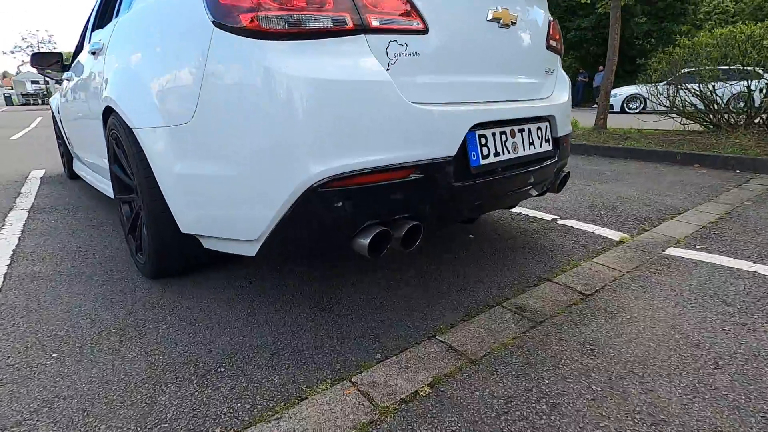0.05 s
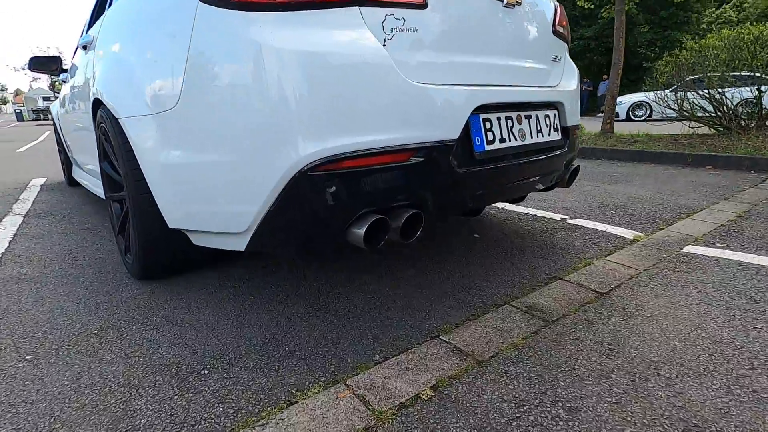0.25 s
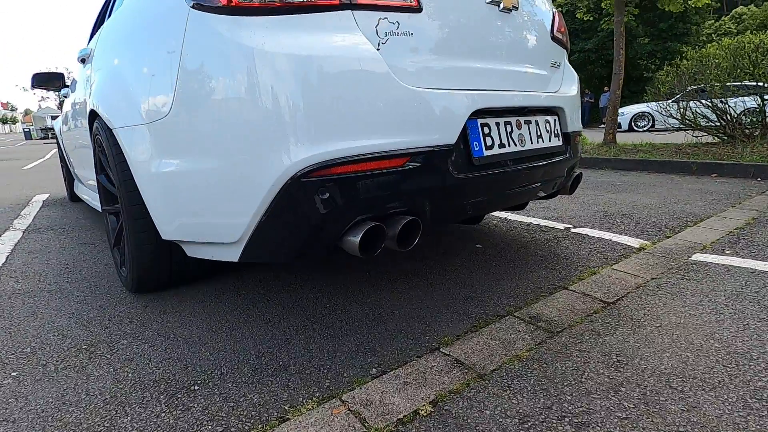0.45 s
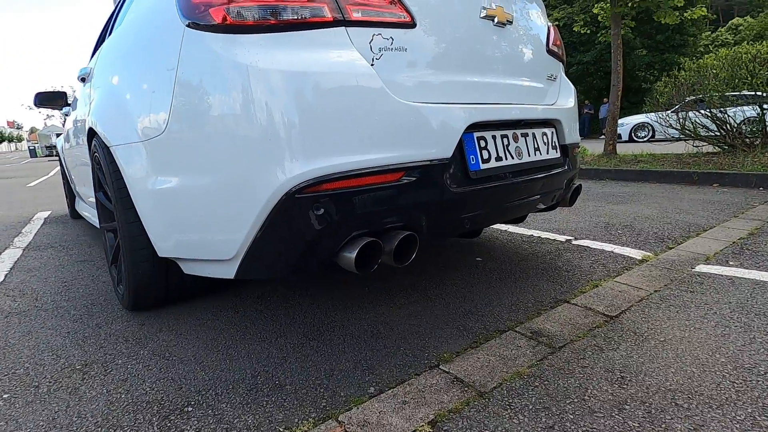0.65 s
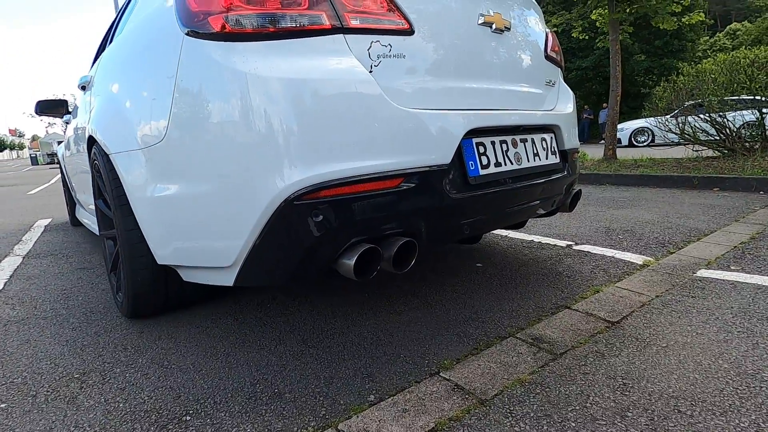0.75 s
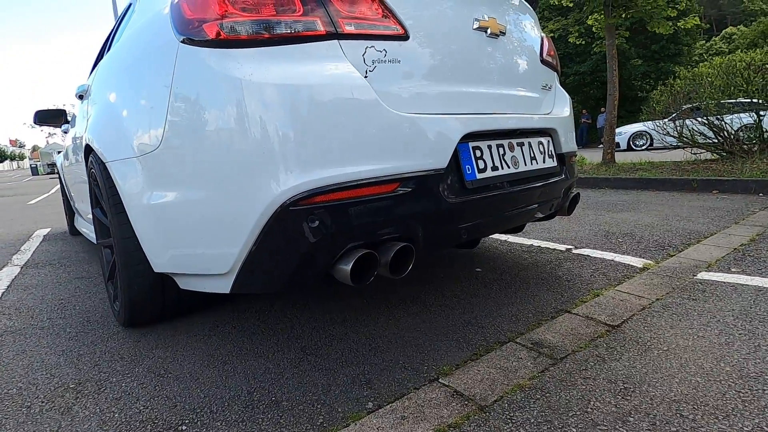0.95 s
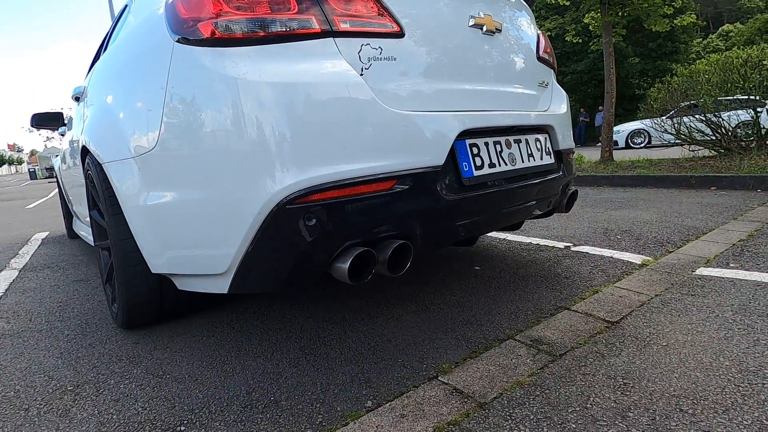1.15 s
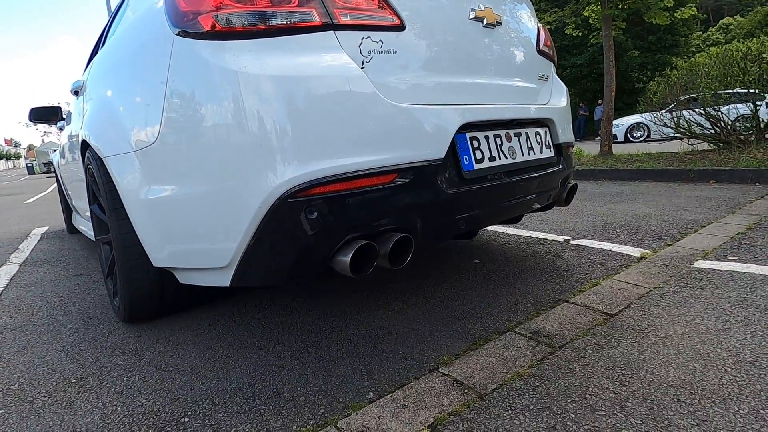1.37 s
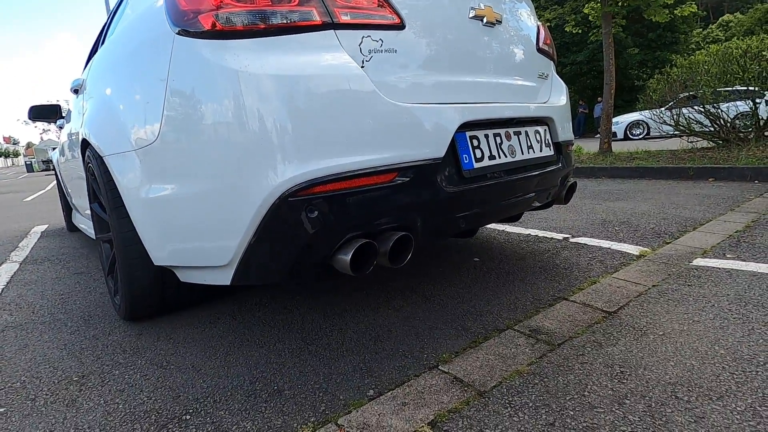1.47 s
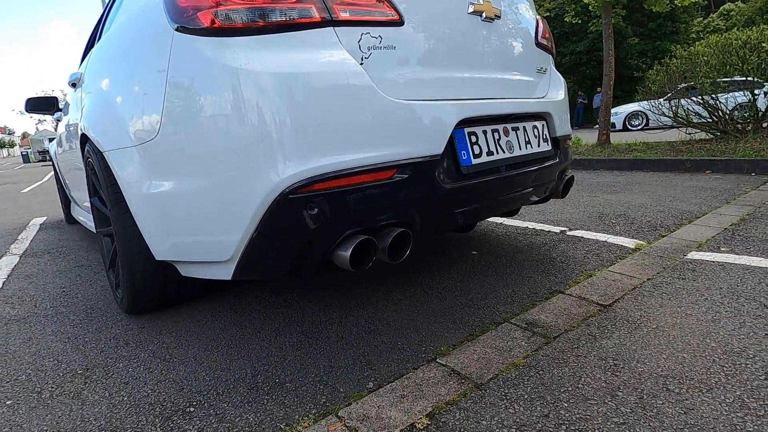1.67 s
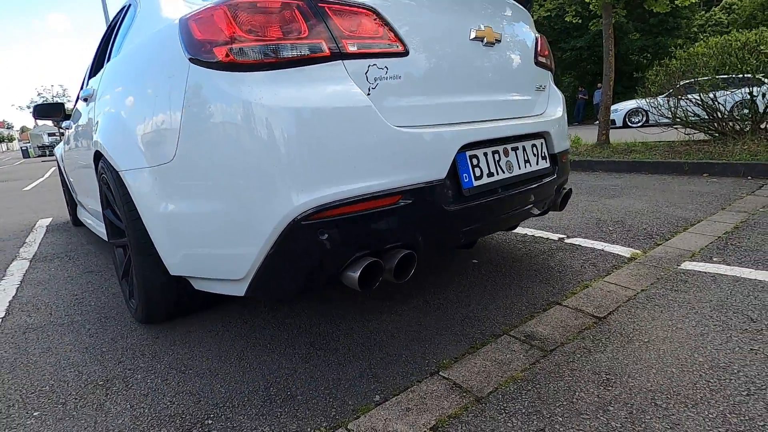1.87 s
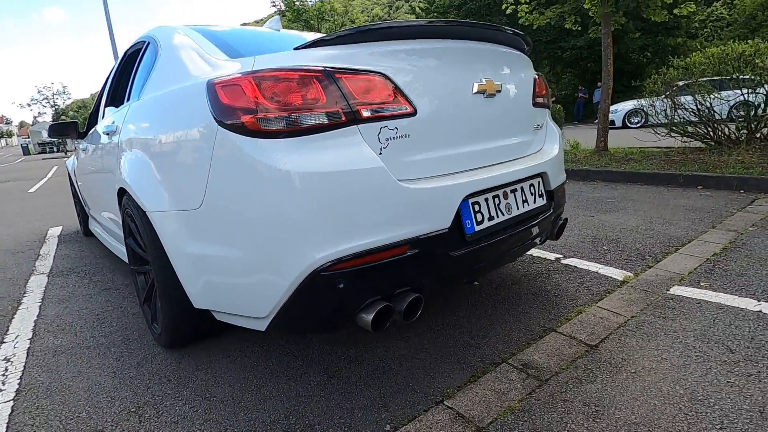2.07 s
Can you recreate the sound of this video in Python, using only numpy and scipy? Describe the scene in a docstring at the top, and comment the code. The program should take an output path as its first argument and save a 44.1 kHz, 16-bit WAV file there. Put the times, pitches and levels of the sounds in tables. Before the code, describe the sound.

A V8 car engine idles with a loud, deep, loping exhaust rumble.

```python
"""A big V8 idles with a heavy lope, heard from just behind its tailpipes in an open car park.
Its uneven firings excite the exhaust resonances into a boom and push out turbulent puffs of gas,
with harder chuffs now and then. From under the car come the engine's hiss, the whine of its belt
drive and faint metallic rasps and rubbing, all of them filtered noise.
A small double click sounds nearby; a limiter holds the bass peaks."""
import sys
import numpy as np
from scipy import signal
from scipy.fft import rfft, irfft, next_fast_len
from scipy.io import wavfile
from scipy.ndimage import uniform_filter1d, minimum_filter1d

SR = 44100
rng = np.random.default_rng(int(sys.argv[2]) if len(sys.argv) > 2 else 0)


def transcribe(signal):
    """Save signal, clipped to [-1, 1], as a 16-bit WAV file at the path in sys.argv[1]."""
    frames = np.atleast_2d(signal).T
    limited = np.clip(frames, -1, 1)
    pcm = np.round(limited * 32767).astype(np.int16)
    wavfile.write(sys.argv[1], SR, pcm)


N = 93227

FIRINGS_PER_CYCLE = 8


def firings(t):
    """Phase is the integral of rate: gives crank position [firings] and each firing's time and number."""
    # idle speed (time [s], rate [firings/s])
    speed = [(0, 60.5), (.13, 59.2), (.27, 58.15), (.7, 58.78), (1.16, 56.2), (1.34, 58.1), (1.49, 55.3),
             (1.65, 57.7), (2.11, 57.05)]
    first_firing_s, jitter_s = -.0261, .0003
    crank = np.cumsum(np.interp(t, *np.array(speed).T)) / SR
    crank = crank - np.interp(first_firing_s, t, crank)
    numbers = np.arange(np.ceil(crank[0]), crank[-1]).astype(int)
    times = np.interp(numbers, crank, t) + jitter_s * rng.standard_normal(len(numbers))
    return crank, times, numbers


def boom(t, times, numbers):
    """Forced resonance: firing pulses ring the exhaust, and the muffler, a low-pass, leaves the bass."""
    # the lope: successive firings over two engine cycles (relative level [dB])
    lope_db = [.7, -3.7, 4.4, -4.5, -2.7, 3.4, -9.6, -.4, -1.5, 1.7, -10.8, 3.4, -.6, -7.2, 5.4, -2.6]
    # exhaust resonances (frequency [Hz], bandwidth [Hz], relative gain [dB])
    pipe_modes = [(70.6, 9.8, -1.2), (88, 17, 1), (133, 7, -1), (146, 9.5, -.5)]
    scatter_db, late_s_per_db, muffler_hz, left_over_right_db = 1.0, .00007, 122, .5
    strength_db = np.take(lope_db, numbers, mode="wrap") + scatter_db * rng.standard_normal(len(numbers))
    drive = pulses(t, times + late_s_per_db * strength_db, undb(strength_db))  # heavy firings lag
    muffler = signal.butter(8, muffler_hz, fs=SR, output="sos")
    bass = signal.sosfilt(muffler, ring(drive, pipe_modes))
    balance = undb(np.array([[left_over_right_db], [-left_over_right_db]]) / 2)
    return level(bass, db=-13.3) * balance


def gas(t, times, numbers):
    """Turbulent jet noise: each firing pushes a puff of gas out of the tailpipes."""
    # successive puffs over two engine cycles (relative level [dB])
    puff_db = [3.5, -3, 4.5, -2, 0, 4, -5, 2, -4, 3, -4, 3, 1, -5, 3.5, -2]
    # spectrum of the rushing gas (frequency [Hz], relative density [dB])
    spectrum = [(100, 5), (170, 13.5), (205, -.5), (270, 4), (320, 4.5), (365, 1), (400, -5.5), (440, -2.5),
                (520, -10), (610, -8), (665, -17), (755, -6.5), (860, -18), (960, -12.5), (1080, -22),
                (1210, -12.5), (1450, -22.5), (2800, -29), (4400, -39), (7000, -49), (8600, -41),
                (12000, -62)]
    delay_s, rise_s, scatter_db = .005, .0046, .5
    strength_db = np.take(puff_db, numbers, mode="wrap") + scatter_db * rng.standard_normal(len(numbers))
    drive = pulses(t, times + delay_s, undb(strength_db))
    # critically damped response: each puff swells for rise_s, then dies away
    envelope = shape(drive, lambda f: 1 / (1 + 2j * np.pi * f * rise_s) ** 2)
    return level(colour(stereo_noise(t) * envelope, spectrum), db=-36)


def chuffs(t):
    """Bursts of turbulence: now and then a harder gust rasps in the tailpipes."""
    # gusts at their peaks (time [s], level [dB])
    gusts = [(.022, -41), (.055, -44.5), (.168, -44.5), (.34, -41.5), (.44, -47), (.615, -42.5),
             (.718, -44), (.89, -44), (1.325, -46), (1.399, -43), (1.449, -39.5), (1.565, -45),
             (1.675, -47), (1.73, -47), (1.85, -44.5), (2.012, -46)]
    # spectrum of a gust (frequency [Hz], relative density [dB])
    spectrum = [(300, -14), (560, -4), (670, -8), (770, 0), (860, -6), (960, 1), (1080, -6), (1210, 0),
                (1450, -11), (3000, -19), (5000, -25), (7000, -34), (9000, -30), (12000, -54.5)]
    envelope = sum(undb(db) * gaussian(t - at, sigma=.008) for at, db in gusts)
    return envelope * level(colour(stereo_noise(t), spectrum), 0)


def hiss(t, crank):
    """Amplitude modulation: the engine's broadband hiss swells slightly once a cycle."""
    # spectrum of the hiss (frequency [Hz], relative density [dB])
    spectrum = [(200, 5), (700, 7.5), (1500, -2), (2100, 2), (2600, 1), (3150, 1), (3500, -4.5),
                (4400, -4.5), (5500, -7.5), (7000, -17), (7900, -15.5), (9000, -19), (10200, -32),
                (11500, -44), (15000, -54)]
    swell_db, peak_firing = .4, 3.3
    cycle = (crank - peak_firing) / FIRINGS_PER_CYCLE
    swell = undb(swell_db * np.cos(2 * np.pi * cycle))
    return level(colour(stereo_noise(t), spectrum) * swell, db=-49.3)


def whine(t):
    """Narrow-band noise is heard as a wavering tone: the faint whines of the belt drive."""
    # belt drive tones (frequency [Hz], level [dB])
    tones = [(2202, -69), (2557, -61.5), (2638, -68), (2950, -63), (3246, -70), (3741, -66), (4091, -67.5)]
    width_hz = 42
    noise = stereo_noise(t)
    return sum(level(ring(noise, [(hz, width_hz, 0)]), db) for hz, db in tones)


def rasps(t):
    """Sidebands: slow noise times a gliding tone makes a narrow metallic rasp that flares up briefly."""
    # flares of rasp (time [s], gain [dB], frequency [Hz], glide [Hz/s])
    flares = [(.42, -52, 3080, -500), (.70, -52, 2980, -3000), (1.0, -56, 2850, -2000),
              (1.27, -54, 2850, 2000), (1.38, -55, 3100, -2000), (1.65, -52, 3120, 2500),
              (1.74, -55, 2650, -3000), (1.98, -55, 2980, -1500)]
    half_width_hz = 190
    grain = level(shape(stereo_noise(t), lambda f: np.exp(-(f / half_width_hz) ** 2)), 0)
    tones = 0
    for at, db, hz, glide in flares:
        phase = 2 * np.pi * np.cumsum(hz + glide * (t - at)) / SR
        tones = tones + undb(db) * gaussian(t - at, sigma=.026) * np.sin(phase)
    return grain * tones


def rubs(t, crank):
    """Friction noise through resonances: faint metallic chirps return each cycle, unevenly strong."""
    # rubbing bands (frequency [Hz], bandwidth per pass [Hz], level [dB], crank at peak [firings])
    bands = [(4440, 300, -64.5, 3.1), (2983, 350, -66, 2.4), (4050, 350, -69, 5.6),
             (8800, 1900, -78.5, 7.1)]
    sigma_firings, uneven_db = .88, 1.0
    half_cycle = FIRINGS_PER_CYCLE / 2
    chirps = 0
    for hz, width, db, peak in bands:
        from_peak = (crank - peak + half_cycle) % FIRINGS_PER_CYCLE - half_cycle
        envelope = gaussian(from_peak, sigma_firings) * undb(uneven_db * wander(t, hz=1))
        friction = stereo_noise(t) * envelope
        mode = [(hz, width, 0)]
        chirps = chirps + level(ring(ring(friction, mode), mode), db)  # two passes steepen the band
    return chirps


def clicks(t):
    """Transients: two noise bursts with sudden onset and exponential decay make a dry click nearby."""
    # onsets of the double click (time [s], level [dB])
    onsets = [(0.5178, -41), (.5250, -33)]
    # spectrum of the click (frequency [Hz], relative density [dB])
    spectrum = [(800, -18), (1800, 2), (2600, -2), (3600, 3), (5200, -0.5), (6500, -15), (8000, -11),
                (11000, -39), (14000, -55)]
    decay_s = .0022
    envelope = sum(undb(db) * (t >= at) * np.exp(-np.abs(t - at) / decay_s) for at, db in onsets)
    return envelope * level(colour(stereo_noise(t), spectrum), 0)


def stereo_noise(t):
    """Partial coherence: left and right noise are alike in the bass and diverge in the treble."""
    # stereo width (frequency [Hz], side relative to mid [dB])
    width = [(100, -26), (350, -16.5), (700, -14.5), (1400, -8.5), (2800, -7), (5600, -3.5), (9000, -1)]
    mid, side = rng.standard_normal((2, len(t)))
    side = colour(side, width)
    return np.array([mid + side, mid - side])


def wander(t, hz):
    """Band-limited noise: a slow random drift around a given rate, with unit rms."""
    return level(ring(rng.standard_normal(len(t)), [(hz, hz, 0)]), 0)


def pulses(t, times, sizes):
    """Impulse train: one pulse at each time."""
    at = np.round((times - t[0]) * SR).astype(int)
    inside = (at >= 0) & (at < len(t))
    return np.bincount(at[inside], sizes[inside], len(t))


def gaussian(offset, sigma):
    """Gaussian envelope with a peak of 1 at zero offset."""
    return np.exp(-(offset / sigma) ** 2 / 2)


def ring(x, modes):
    """Parallel resonators (frequency [Hz], bandwidth [Hz], gain [dB])."""
    return shape(x, lambda f: sum(undb(db) / (1 + 1j * (f / hz - hz / f) * hz / width)
                                  for hz, width, db in modes))


def colour(x, points):
    """Spectral shaping by a curve through points (frequency [Hz], gain [dB])."""
    hz, db = np.array(points).T
    return shape(x, lambda f: undb(np.interp(np.log(f), np.log(hz), db)))


def shape(x, response):
    """Linear filtering: multiply the spectrum by a frequency response."""
    size = next_fast_len(x.shape[-1] + 8192)
    f = np.maximum(np.fft.rfftfreq(size, 1 / SR), 1e-3)
    return irfft(rfft(x, size) * response(f), size)[..., :x.shape[-1]]


def level(x, db):
    """Scale to an rms level."""
    return x * undb(db) / np.sqrt(np.mean(x ** 2))


def undb(db):
    """Decibels to amplitude ratio."""
    return 10 ** (np.asarray(db) / 20)


def scene():
    """Superposition of exhaust, engine and click."""
    lead_s = .4  # the engine is already running at time zero
    t = np.arange(-int(lead_s * SR), N) / SR
    crank, times, numbers = firings(t)
    exhaust = boom(t, times, numbers) + gas(t, times, numbers) + chuffs(t)
    engine = hiss(t, crank) + whine(t) + rubs(t, crank) + rasps(t)
    return (exhaust + engine + clicks(t))[:, -N:]


def record(dry):
    """Peak limiting holds the bass to one height; the ends fade and a low-pass cuts the top."""
    ceiling, limiter_s, fade_s, top_hz = .41, .0087, .012, 15000
    window = int(limiter_s * SR)
    allowed_gain = ceiling / np.maximum(np.abs(dry).mean(axis=0), ceiling)
    gain = uniform_filter1d(minimum_filter1d(allowed_gain, window), window)
    from_edge_s = np.minimum(np.arange(N), np.arange(N)[::-1]) / SR
    fade = np.sin(np.pi / 2 * np.minimum(from_edge_s / fade_s, 1))
    low_pass = signal.ellip(8, .2, 70, top_hz, fs=SR, output="sos")
    return signal.sosfilt(low_pass, dry * gain * fade)


dry = scene()
out = record(dry)
transcribe(out)
```